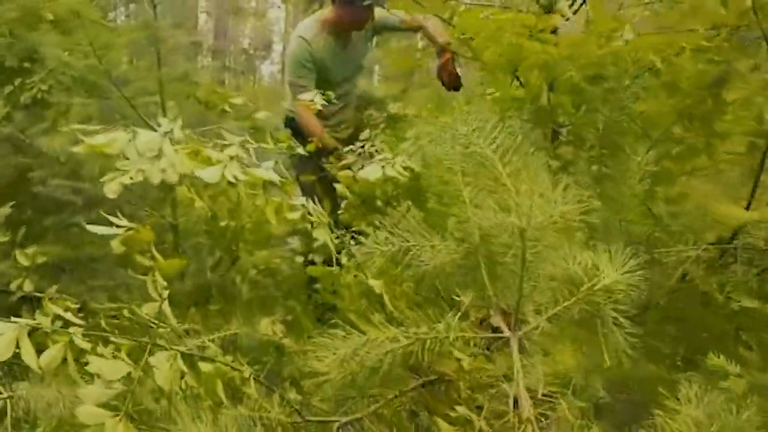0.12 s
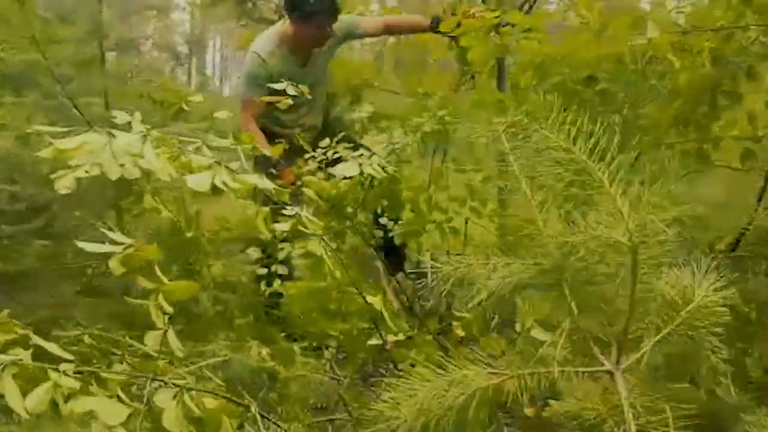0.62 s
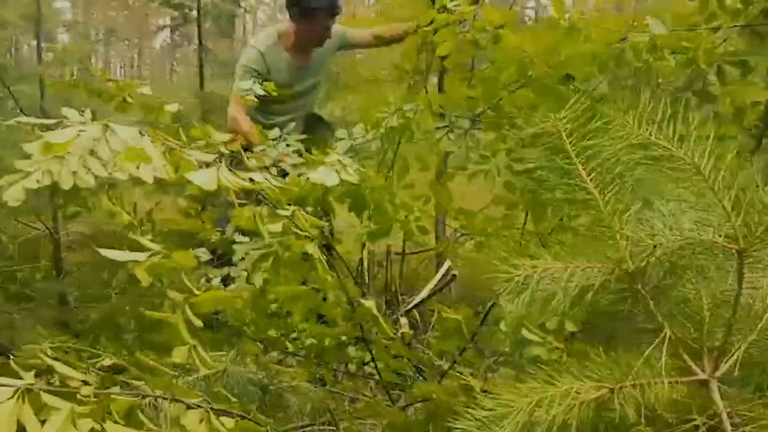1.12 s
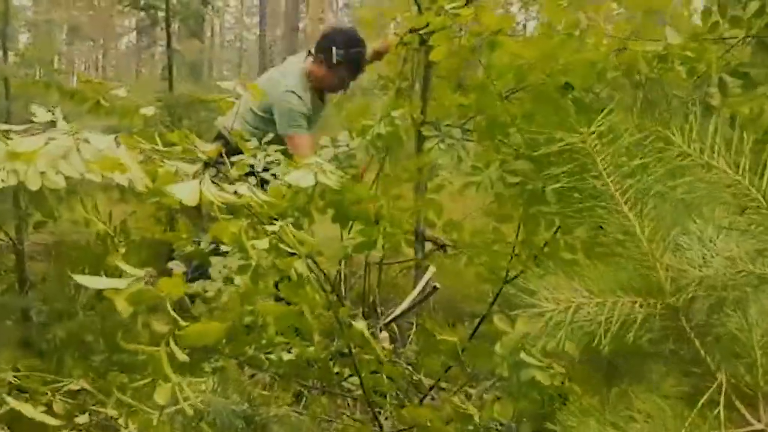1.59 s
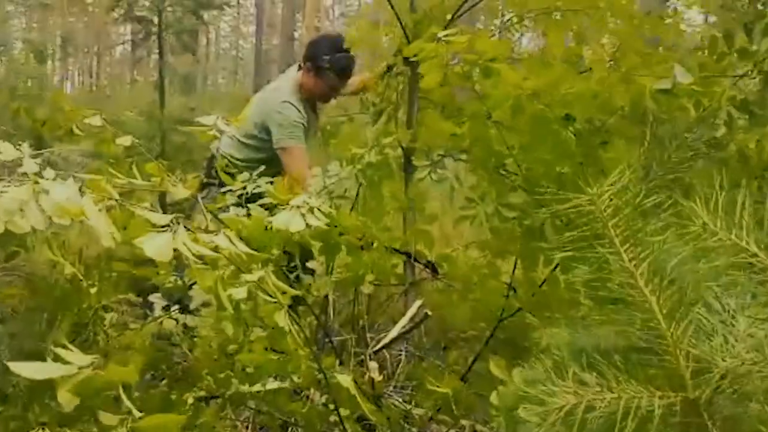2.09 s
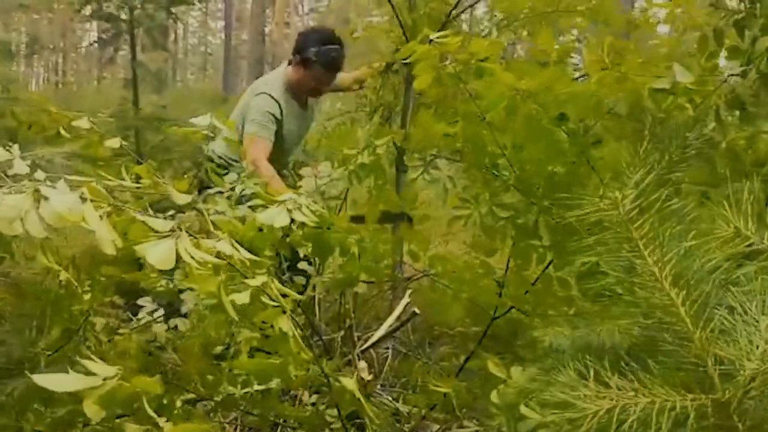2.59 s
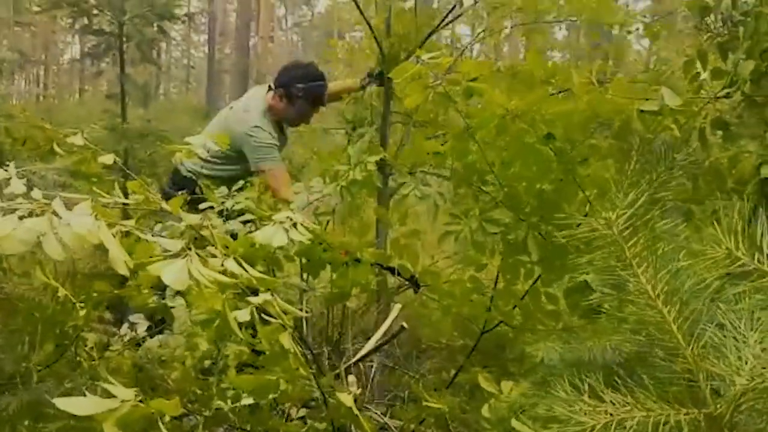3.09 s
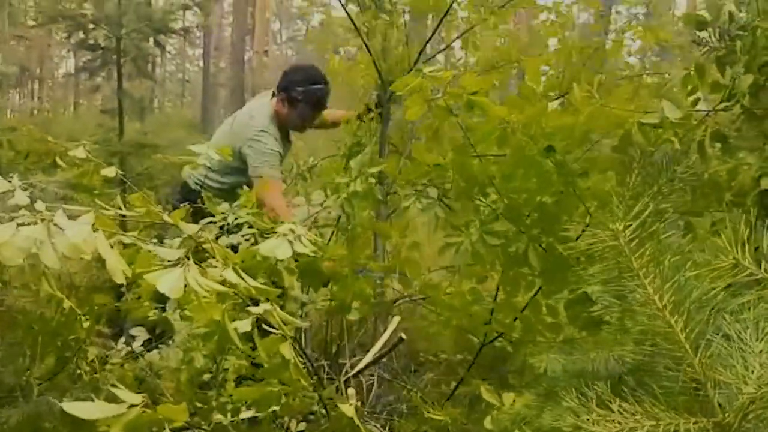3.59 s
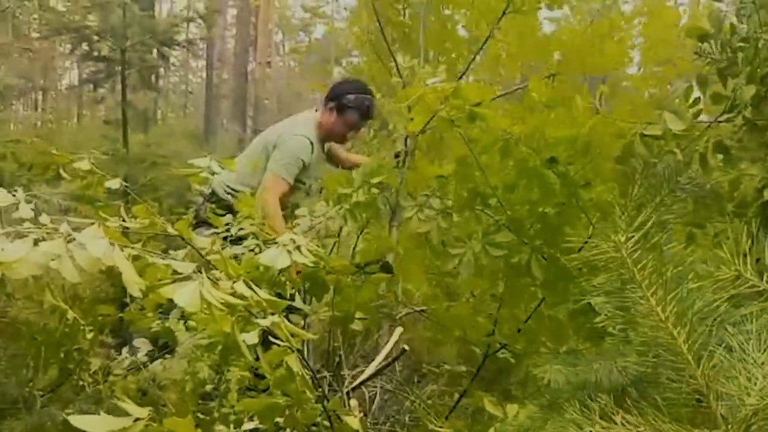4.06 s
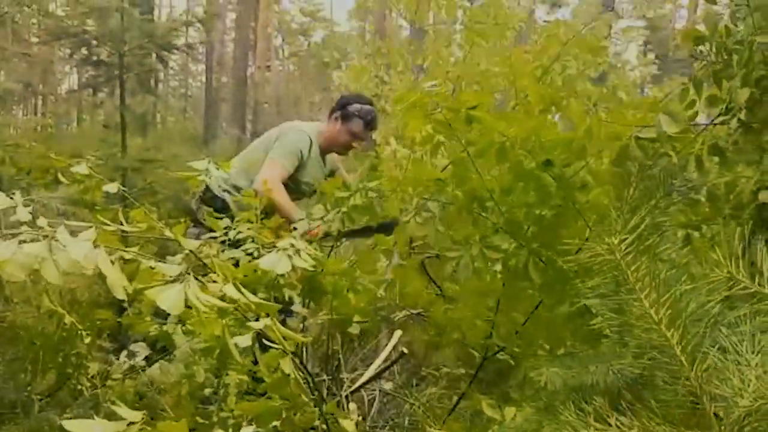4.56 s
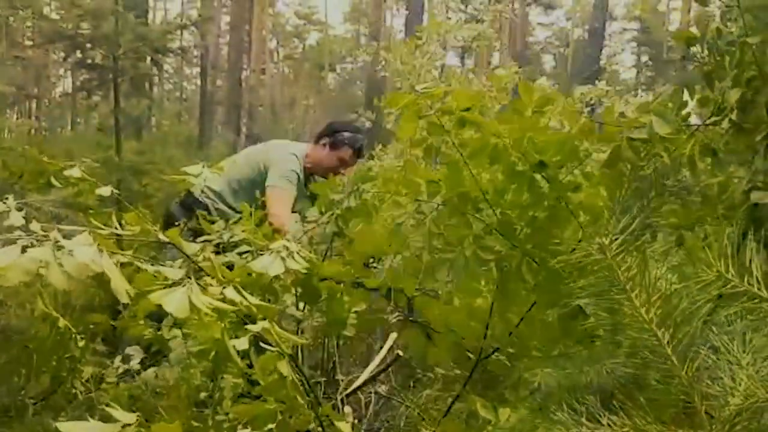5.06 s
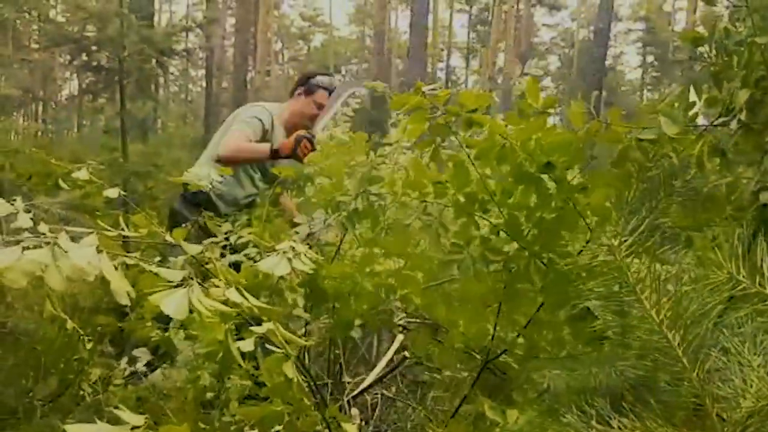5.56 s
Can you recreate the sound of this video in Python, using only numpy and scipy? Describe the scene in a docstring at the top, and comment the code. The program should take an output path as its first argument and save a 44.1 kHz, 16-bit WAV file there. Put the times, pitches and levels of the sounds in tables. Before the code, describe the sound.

Three spaced thumping chops into a springy sapling, amid faint rustling foliage and a growing burst of crackling, splintering wood fibres.

```python
"""Rustling leaves (hiss with tiny clicks) and a low outdoor rumble (filtered noise) run all through.
Wood fibres and twigs crack from the start: short pitched snaps with a wood ring and a spit of treble.
Dull hollow knocks, a pulse and a boom each, join from 0.6 s. A hand blade chops a green stem at 1.6, 3.0 and 5.0 s:
crunching noise, a ringing edge, a stem thump and shaken leaves. Cracks crowd in as the sapling is bent over
between the last two blows. Two close microphone ports hear it all."""
import sys
import numpy as np
from scipy import signal
from scipy.fft import rfft, irfft, next_fast_len
from scipy.io import wavfile
from scipy.ndimage import uniform_filter1d

SR = 44100
rng = np.random.default_rng(int(sys.argv[2]) if len(sys.argv) > 2 else 0)


def voltage_ratio(level):
    """Linear amplitude factor for a level in decibels (scalar or array-like)."""
    return 10 ** (np.asarray(level, float) / 20)


def file_out(sig):
    """Save sig as 16-bit WAV at sys.argv[1]."""
    # one column per channel
    cols = np.atleast_2d(sig).T
    # limit, then scale
    lim = np.clip(cols, -1, 1)
    pcm = np.round(lim * 32767).astype(np.int16)
    wavfile.write(sys.argv[1], SR, pcm)


N = 250295  # length in samples
PAD = next_fast_len(N)  # working length in samples, quick to transform

# Leaf movement: (time [s], rustle level [dB], treble level [dB])
LEAF_LEVELS = [(0, -61.5, -68.5), (.2, -61.5, -68.5), (.38, -57.5, -60), (.62, -58.5, -58),
               (.76, -53.5, -58), (.86, -58.5, -62), (1.04, -59.5, -59.5), (1.24, -61.5, -67.5),
               (1.43, -57.5, -57), (1.9, -63.5, -72.5), (2.0, -59, -64.5), (2.1, -62, -67),
               (2.5, -61, -63.5), (2.7, -63.5, -69), (2.94, -71.5, -72.5), (3.42, -69.5, -71.5),
               (3.55, -65, -69.5), (4.05, -67, -68.5), (4.45, -60.5, -63), (4.57, -66, -70),
               (4.84, -68.5, -72), (5.2, -58.5, -62.5), (5.42, -58.5, -63.5), (5.52, -62, -71.5),
               (5.68, -63, -66)]
# Tone of rustling leaves: (frequency [Hz], relative level [dB])
LEAF_COLOUR = [(71, -27), (120, -1.5), (231, -5), (308, -0.5), (348, -2), (402, -4.5), (473, -7), (698, -6),
               (988, -7.5), (1980, -1.5), (2530, -3.5), (4590, -4.5), (6500, -12.5), (15000, -6.5),
               (16000, -36)]
# Tone of the outdoor rumble: (frequency [Hz], relative level [dB])
RUMBLE_COLOUR = [(12, -53), (20, -32), (22, -1), (49, 6), (118, -1.5), (176, -2), (200, -7), (260, -46),
                 (440, -120)]
# How alike left and right are: (frequency [Hz], likeness [share from 0 to 1])
LIKENESS = [(60, 0.94), (300, 0.86), (1400, 0.62), (3100, 0.12), (6800, .03), (16000, 0.011)]
# Clear cracks of fibres and twigs, before the wood, treble and echo settings in cracks():
# (time [s], snap level [dB], snap pitch [Hz], treble against snap [dB], low part against snap [dB])
CLEAR_CRACKS = [(0.1108, -37.5, 1960, -13, -24), (0.1268, -38, 1610, -24, -9), (0.345, -52, 1300, -12, 4),
                (0.3726, -51.5, 1740, 2, 6), (0.4208, -50, 2060, 13, -2), (0.4435, -51, 1970, -1, -7),
                (0.7555, -47.5, 1900, -9, 0), (1.432, -46.5, 2780, -5, -6), (1.5124, -47, 2340, -4, -8),
                (1.905, -47.5, 1440, -17, 3), (2.4489, -49, 1810, 0, 0), (0.5575, -43, 1860, -11, -1),
                (1.2538, -48.5, 1760, 3.5, -3), (1.6321, -25.5, 1570, 0.5, 2),
                (1.6354, -24.5, 1350, 0, -0.5), (1.651, -30, 1630, -14, -14), (2.0083, -42, 1598, -16, -11),
                (2.2322, -35.5, 2140, -3, -11.5), (2.3226, -40, 1520, -26, -5.5),
                (2.3707, -37, 1630, -24, -6), (2.5624, -55, 2050, 13.5, -23), (2.7205, -44.5, 2740, -9, -9),
                (2.7634, -40.5, 1820, -7, -14), (3.0388, -28, 2200, -19, -3),
                (3.0409, -28.5, 1920, -1, -22), (3.2125, -41.5, 1790, -9, -12),
                (3.338, -46.5, 2350, -12, -26), (3.473, -48.5, 2020, -0.5, -16),
                (3.514, -45, 2550, -2, -27), (3.5314, -42, 2580, -1, -32),
                (3.6559, -42.5, 2270, -5.5, -2.5), (3.6743, -41, 2060, -14, -30),
                (3.6866, -44, 2710, -9, -12), (3.745, -56.5, 2460, 16, -8), (3.748, -34.5, 2750, -3.5, -31),
                (3.804, -46, 1870, -2, -24), (3.916, -37, 2570, -3.5, -34), (3.9417, -57, 2080, 11, -3),
                (3.9711, -40.5, 2140, -11, -32), (3.9849, -47, 1980, -9, -12),
                (4.0322, -31, 2060, -11, -41), (4.049, -20, 1800, -7, -23),
                (4.0988, -26.5, 2420, -17.5, -39), (4.131, -33, 2450, -3.5, -19),
                (4.1743, -33.5, 2480, -6.5, -27), (4.2089, -40.5, 2340, -8, -24),
                (4.229, -42.5, 2110, -12, -28), (4.2763, -32, 2470, -5, -34),
                (4.283, -22, 2210, -11, -20.5), (4.2894, -39, 2490, -12, -22), (4.2925, -21, 2270, -9, -35),
                (4.2945, -22, 2240, -5.5, -29), (4.3282, -43.5, 2500, -6, -23),
                (4.385, -22.5, 2170, -9, -16.5), (4.39, -20, 2320, -10, -37),
                (4.402, -33.5, 2220, -1.5, -27), (4.421, -42, 2100, -7, -23), (4.4466, -40, 2240, -7, -30),
                (4.467, -36.5, 2220, -0.5, -25), (4.4737, -34.5, 1740, -9, -26),
                (4.4885, -38, 2190, -5, -17), (4.5026, -44, 2100, -15, -23), (4.5232, -39.5, 2050, -2, -26),
                (4.5571, -30, 1980, -7, -39), (4.612, -40, 2100, -13, -35), (4.6563, -45.5, 2490, -6, -15),
                (4.6866, -45, 2200, -15, -28), (4.7366, -40, 2220, -11, -34), (4.843, -44, 2624, -2, -33),
                (4.8703, -42.5, 2140, 1, -29), (4.8745, -33, 2070, -11, -43), (4.9444, -44, 2310, -25, -26),
                (4.9534, -25, 2550, -12, -17), (4.9588, -12, 2210, -13, -10), (4.9605, -32, 2400, -1, -22),
                (4.9655, -28.5, 2000, 6, -8), (4.9815, -31.5, 2400, -4, -8), (5.029, -30.5, 1880, -14, -28),
                (5.062, -38, 1770, -11, -15), (5.105, -36.5, 2080, -8.5, -9.5),
                (5.1272, -42.5, 2050, -3, -15), (5.149, -42.5, 2200, -13, -17)]
# Wood ring shared by cracks, before each crack varies it: (pitch [Hz], relative level [dB], 60 dB decay [s])
WOOD_RING = [(1571, 3, 0.016), (2140, -3, 0.013), (2460, -8.5, 0.023)]
# Treble tone of a crack: (frequency [Hz], relative level [dB])
SNAP_COLOUR = [(1940, -31), (3300, -1.5), (3870, -5), (6390, -4.5), (7440, -12), (8710, -5.5), (9690, -8.5),
               (10600, -6), (12200, -8.5), (15200, -4), (16000, -21.5)]
# Knocks on something hollow: (time [s], click level [dB], boom level [dB], boom pitch before ring() lowers it [Hz])
KNOCKS = [(0.562, -53, -47, 113), (1.88, -48, -37, 420), (1.904, -51, -56, 500),
          (1.9365, -17.5, -31.5, 193), (2.233, -58, -46.5, 123), (3.664, -42, -39.5, 169)]
# Blade blows: (time [s], bite until the stem swings back [s], crunch level [dB], edge ring level [dB],
# thump level before it is halved [dB], stem pitch factor [ratio])
BLOWS = [(1.628, 0.014, -30, -44, -19.5, 1.035), (3.0372, 0.012, -33.5, -23, -18, 1.055),
         (4.954, .0195, -37.5, -41, -22, 1.074)]
# Swing of the rooted stem, before each blow's factor: (pitch [Hz], relative level [dB], 60 dB decay [s])
STEM_SWING = [(110, 4, 0.23), (207, -4, 0.15), (313, -8.5, 0.042), (803, -11, .05)]
# Ring of the blade edge, before ring() lowers it: (pitch [Hz], relative level [dB], 60 dB decay [s])
BLADE_RING = [(6680, -1, .014), (8360, -6, 0.016)]
# Tone of crunching wood and of shaken leaves: (frequency [Hz], relative level [dB])
CRUNCH_COLOUR = [(240, -10), (400, -6), (865, -1), (2710, -2), (3310, -8.5), (3930, -6), (5190, -6),
                 (5870, -14), (6440, -6.5), (7510, -13), (8500, -7), (9180, -11.5), (12100, -11),
                 (14600, -5.5), (16000, -24)]
# Tone difference of the two ports: (frequency [Hz], left minus right [dB])
PORT_DIFFERENCE = [(60, -0.2), (400, -1), (1300, 1.2), (2500, 2), (4200, -3), (6000, -13), (8100, -2),
                   (15000, 1.5)]

HISS_DB, HISS_TREBLE_SHARE = -3, 0.41  # upper-middle hiss lies between rustle and treble
LOW_DB, LOW_FOLLOW, CALM_DB = -64, 0.37, -62  # low rustle partly follows the leaves' rise above calm
RUMBLE_DB = -71  # middle level, before slow wandering
CRACK_LAG, BLOW_LAG = 1.85, 1.26  # samples by which the left port hears these late
CRACK_PAN_DB = 0.5  # left-right spread of the places where cracks happen
TICKS, TICK_DB, TICK_HZ, TICK_TREBLE_DB, TICK_LOW_DB = 55, 5.5, 2050, -5.5, -8.5
SMALL_SPREAD_DB, SMALL_SPREAD_HZ, SMALL_COLOUR_DB = 2.5, 310, 5  # random spread of every small crack
# Splinters after each blow: how many, mean delay, level against the thump setting, loss with delay
SPLINTERS, SPLINTER_S, SPLINTER_DB, SPLINTER_DB_PER_S = 5, 0.025, -19.5, 152
# Fibres crackle faintly while the sapling is bent over: how many, from and to (s), level, pitch, low part
FIBRES, BEND_S = 30, (3.44, 4.75)
FIBRE_DB, FIBRE_HZ, FIBRE_LOW_DB = -51.5, 2400, -24
CRUNCH_S, SWING_HOLD_S, RING_LEAD_S = 0.0075, 0.014, 0.0079  # the edge rings this long before the swing
BODY_DB, SHAKE_DB, SHAKE_T60_S = -21.5, -23, 0.65  # cut wood and shaken leaves, against the thump setting


def on_hz(table, hz):
    """Read a (frequency, value) table, sliding between rows on a log-frequency scale."""
    table_hz, value = np.transpose(table)
    return np.interp(np.log(hz + 1), np.log(table_hz), value)


def colour(x, table, lo_hz=0., hi_hz=30000.):
    """Filter a sound inside soft band edges; white noise of unit power keeps unit power."""
    hz = np.fft.rfftfreq(x.shape[-1], 1 / SR)
    band_power = 1 / (1 + (lo_hz / (hz + 1)) ** 8) / (1 + (hz / hi_hz) ** 8)
    gain = voltage_ratio(on_hz(table, hz)) * np.sqrt(band_power)
    return irfft(rfft(x) * gain / np.sqrt(np.mean(gain ** 2)), x.shape[-1])


def spread(pair):
    """Mix two unrelated signals into left and right: alike in the bass, nearly unrelated in the treble."""
    alike = np.clip(on_hz(LIKENESS, np.fft.rfftfreq(pair.shape[-1], 1 / SR)), 0, 1)
    mid = rfft(pair[0]) * np.sqrt((1 + alike) / 2)
    side = rfft(pair[1]) * np.sqrt((1 - alike) / 2)
    return irfft(np.array([mid + side, mid - side]), pair.shape[-1])


def fade(t, t60):
    """Silent before t = 0, then dying away to 60 dB down after t60 seconds."""
    return (t >= 0) * np.exp(-np.log(1000) * np.maximum(t, 0) / max(t60, 1e-3))


def ring(t, modes, factor=0.97):
    """Dying sine tones struck at t = 0, with all pitches scaled by the factor."""
    return sum(voltage_ratio(db) * fade(t, t60) * np.sin(2 * np.pi * hz * factor * t) for hz, db, t60 in modes)


def add(out, s, wave, pan_db=0.):
    """Place a sound at both ports, louder on the left by pan_db."""
    start = int(s * SR)
    sides = voltage_ratio(np.array([[pan_db], [-pan_db]]) / 2)
    out[:, start:start + wave.shape[-1]] += (np.atleast_2d(wave) * sides)[:, :PAD - start]


def walk(rate):
    """Random levels, drawn rate times a second and smoothed twice."""
    k = int(SR / rate)
    held = np.repeat(rng.standard_normal(PAD // k + 1), k)
    return uniform_filter1d(uniform_filter1d(held, k), k)[:PAD]


def late_left(x, lag):
    """Delay the left channel by a few samples, fractions included."""
    turn = np.exp(-2j * np.pi * np.fft.rfftfreq(PAD) * lag)
    return np.array([irfft(rfft(x[0]) * turn, PAD), x[1]])


def rubbing(rate, share, scatter_db):
    """Rubbing leaves: hiss with dense tiny clicks of uneven size, spread over both ports."""
    hits = rng.random((2, PAD)) < rate / SR
    clicks = rng.standard_normal((2, PAD)) * hits * voltage_ratio(scatter_db * rng.standard_normal((2, PAD)))
    return spread(rng.standard_normal((2, PAD)) + share * clicks / np.sqrt(np.mean(clicks ** 2)))


def leaf_db(t):
    """Levels of rustle, hiss, top hiss and low rustle at times t, all led by the leaf movement."""
    s, rustle, treble = np.transpose(LEAF_LEVELS)
    rustle, treble = np.interp(t, s, rustle), np.interp(t, s, treble)
    hiss = HISS_DB + rustle + HISS_TREBLE_SHARE * (treble - rustle)
    low = LOW_DB + LOW_FOLLOW * (rustle - CALM_DB)
    return rustle, hiss, treble, low


def foliage():
    """Leaves rub in four frequency ranges, each flickering on its own as the leaves move."""
    ranges = []
    # from Hz, to Hz, strength of the slower flicker in dB
    for lo_hz, hi_hz, flicker_db in [(850.0, 3130.0, 2.5), (3780.0, 8600.0, 1.26),
                                     (7560.0, 38000.0, 2.0), (142.0, 1030.0, 2.5)]:
        flicker = voltage_ratio(flicker_db * walk(25.114) + 1.35 * walk(140))
        x = colour(rubbing(1500, 0.52, 4.4), LEAF_COLOUR, lo_hz, hi_hz) * flicker
        ranges.append(x / np.sqrt(np.mean(x ** 2)))
    return sum(x * voltage_ratio(db) for x, db in zip(ranges, leaf_db(np.arange(PAD) / SR)))


def outdoor_rumble():
    """Low noise, nearly alike at both ports, whose level wanders slowly."""
    level = voltage_ratio(RUMBLE_DB + 2 * walk(2.85))
    return level * colour(spread(rng.standard_normal((2, PAD))), RUMBLE_COLOUR, 0., 159.0)


def small_cracks():
    """Random crack rows: ticks follow the rustle, splinters die away after blows, fibres snap in the bend."""
    at = (np.arange(TICKS) + rng.random(TICKS)) * N / SR / TICKS
    db = leaf_db(at)[0] + TICK_DB
    for s, bite_s, *_, thump_db, _ in BLOWS:
        late = SPLINTER_S * rng.exponential(size=SPLINTERS)
        at = np.append(at, s + bite_s + late)
        db = np.append(db, thump_db + SPLINTER_DB - SPLINTER_DB_PER_S * late)
    fibre = np.arange(len(at) + FIBRES) >= len(at)  # marks the rows added next
    at = np.append(at, rng.uniform(*BEND_S, size=FIBRES))
    db = np.append(db, np.full(FIBRES, FIBRE_DB))
    z = rng.standard_normal((len(at), 4)).T
    hz = np.where(fibre, FIBRE_HZ, TICK_HZ) + SMALL_SPREAD_HZ * z[1]
    treble_db = TICK_TREBLE_DB + SMALL_COLOUR_DB * z[2]
    low_db = np.where(fibre, FIBRE_LOW_DB, TICK_LOW_DB) + SMALL_COLOUR_DB * z[3]
    return list(zip(at, db + SMALL_SPREAD_DB * z[0], hz, treble_db, low_db))


def cracks():
    """A break is a cycle or two of its own pitch; wood rings, treble spits and foliage scatters it back."""
    body, spit, tail = np.zeros((3, 2, PAD))
    lead = 64  # samples kept ahead of the snap's peak
    t = (np.arange(3072) - lead) / SR
    for s, db, hz, treble_db, low_db in list(CLEAR_CRACKS) + small_cracks():
        start = max(s - lead / SR, 0)
        noise = rng.standard_normal((3, len(t)))
        pan_db = CRACK_PAN_DB * noise[1, 0]
        snap = -np.exp(-(t / 0.00045) ** 2) * np.cos(2 * np.pi * hz * t)
        # each piece of wood rings a little higher or lower, each mode at its own strength
        pitch = 1 + 0.04 * noise[2, 0]
        wood = 0.16 * sum(ring(t, [mode], pitch) * voltage_ratio(3.5 * z) for mode, z in zip(WOOD_RING, noise[0]))
        low = voltage_ratio(low_db) * np.exp(-(t / 0.0011) ** 2) * np.sin(2 * np.pi * 830 * t)
        add(body, start, voltage_ratio(db) * (snap + wood + low), pan_db)
        # the treble reaches the two ports by partly different paths
        treble_fade = fade(t + 0.00039, 0.0041) + 0.21 * fade(t, 0.058)
        hiss = (0.34 * noise[0] + 0.91 * noise[1:]) * treble_fade
        if treble_db > 6:  # the thinnest dry twigs tick only at the very top
            hiss = np.diff(hiss, 2, prepend=0, append=0) / 2
        add(spit, start, voltage_ratio(db + treble_db + 3.0) * hiss, pan_db)
        echo_fade = fade(t - 0.001, 0.016) + 0.12 * fade(t - 0.002, 0.092)
        add(tail, start, voltage_ratio(db - 10.5) * noise[1:] * echo_fade)
    body = colour(body, [(1, 0), (20000, 0)], 670.0)
    direct = late_left(body + colour(spit, SNAP_COLOUR, 4000.0), CRACK_LAG)
    return direct + colour(spread(tail), CRUNCH_COLOUR, 1480.0, 3530.0)


def knocks():
    """Something hollow gives one rounded pressure pulse, then a few cycles of boom."""
    out, lead = np.zeros((2, PAD)), 64
    t = (np.arange(4096) - lead) / SR
    for s, click_db, boom_db, hz in KNOCKS:
        click = np.exp(-(t / 0.00009) ** 2) - 0.15 * np.exp(-((t - 0.00017) / 0.00009) ** 2)
        boom = -ring(t, [(hz, 0, 4.0 / hz)])  # pulls before it pushes
        add(out, s - lead / SR, voltage_ratio(click_db) * click + voltage_ratio(boom_db) * boom)
    return out


def shaken_leaves():
    """Dense leaf rubbing with a quick flicker, ready for the blows to shake."""
    return colour(rubbing(3000, 0.49, 2.6), CRUNCH_COLOUR, 200.0) * voltage_ratio(2.2 * walk(60))


def blows(leaf):
    """The edge crunches through bark and rings, the stem thumps as the blade jams, ground and crown shake on."""
    out, shake = np.zeros((2, PAD)), 0
    t, clock = np.arange(16384) / SR, np.arange(PAD) / SR
    for s, delay, crunch_db, blade_db, thump_db, factor in BLOWS:
        bite = np.clip(t / (0.5 * CRUNCH_S), 0, 1) * np.where(t < CRUNCH_S, 1, fade(t - CRUNCH_S, 0.027))
        splinters = rng.standard_normal((3, len(t))) * voltage_ratio(4.27 * rng.standard_normal(len(t)))
        crunch = colour(bite * splinters[0], CRUNCH_COLOUR, 450.0, 2370.0)
        crisp = bite * (0.28 * splinters[0] + 1.2 * splinters[1:])
        crunch = crunch + colour(crisp, CRUNCH_COLOUR, 5400.0) * 0.5
        # the swing builds while the blade bites; then the grip on the stem kills most of it
        u = np.maximum(t - delay, 0)
        grip = np.clip(t / (delay - 0.001), 0, 1) ** 2.0 * (0.11 + 0.74 * np.exp(-(u / SWING_HOLD_S) ** 4))
        swing = sum(voltage_ratio(db) * fade(u, t60) * np.sin(2 * np.pi * hz * factor * (t - delay))
                    for hz, db, t60 in STEM_SWING)
        ground = rng.standard_normal(len(t)) * fade(t - delay - 0.01, 0.26)
        ground = colour(ground, [(60, 1), (170, -4), (400, -14.5)], 75., 290.0)
        # low knock of the cut wood
        body = colour(bite * splinters[0], [(150, 1), (330, -2.5), (600, -10.5)], 200.0, 560.0)
        edge = ring(t - (delay - RING_LEAD_S), BLADE_RING)
        cut = voltage_ratio(thump_db + BODY_DB) * body + voltage_ratio(crunch_db) * crunch + voltage_ratio(blade_db) * edge
        add(out, s, cut + voltage_ratio(thump_db) * (voltage_ratio(-20.0) * ground + grip * swing / 2))
        since = clock - s
        shake_fade = fade(since, SHAKE_T60_S) + fade(since, 0.05)
        shake = shake + voltage_ratio(thump_db + SHAKE_DB) * np.clip(since / 0.0068, 0, 1) * shake_fade
    return late_left(out, BLOW_LAG) + shake * leaf


def scene():
    """Moving foliage and rumble under cracks, knocks and blows."""
    background = foliage() + outdoor_rumble()
    return (background + cracks() + knocks() + blows(shaken_leaves()))[:, :N]


def roll_off(x):
    """The treble ends steeply here."""
    return signal.sosfilt(signal.butter(12, 16970, fs=SR, output="sos"), x)


def record(dry):
    """The housing colours the two ports differently; deep bass and the very top are cut."""
    hz = np.fft.rfftfreq(PAD, 1 / SR)
    tilt_db = on_hz(PORT_DIFFERENCE, hz) / 2
    cut = np.sqrt((1 + (hz / 16000) ** 60) * (1 + (34 / (hz + 1)) ** 4))
    ports = irfft(rfft(dry, PAD) * voltage_ratio([tilt_db, -tilt_db]) / cut, PAD)[:, :N]
    return roll_off(ports)


dry = scene()
out = record(dry)
file_out(out)
```